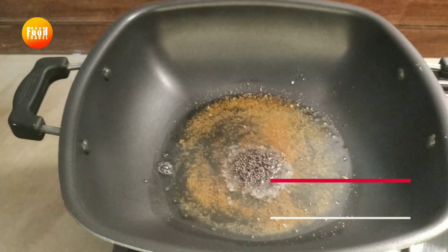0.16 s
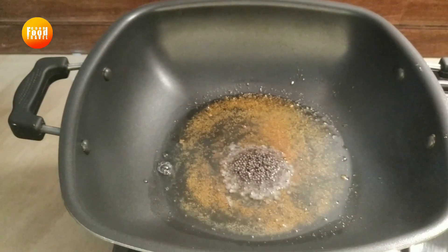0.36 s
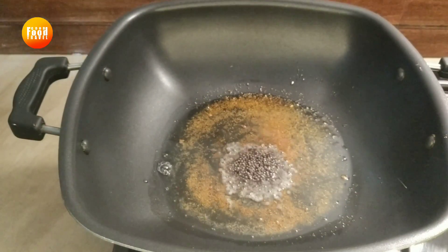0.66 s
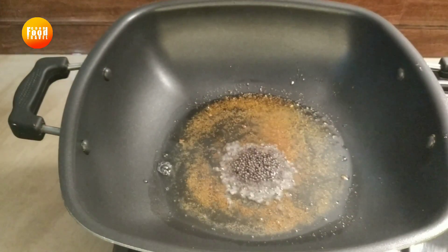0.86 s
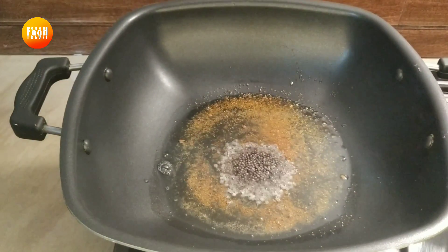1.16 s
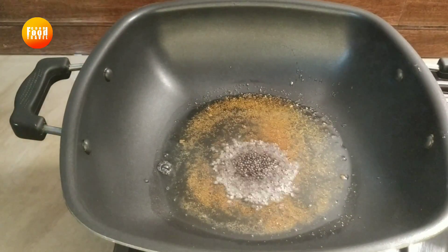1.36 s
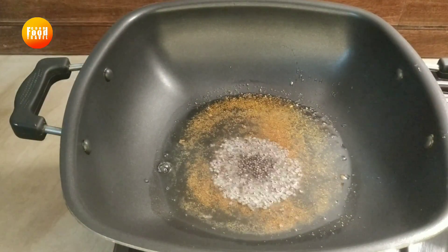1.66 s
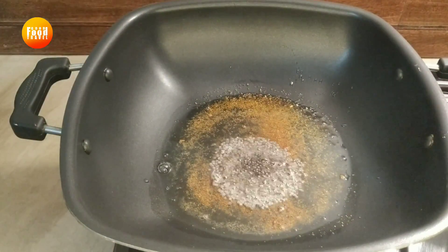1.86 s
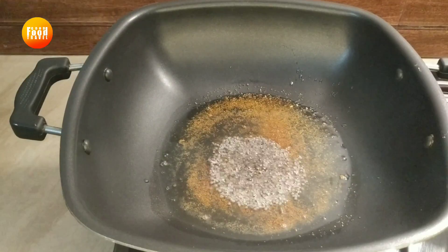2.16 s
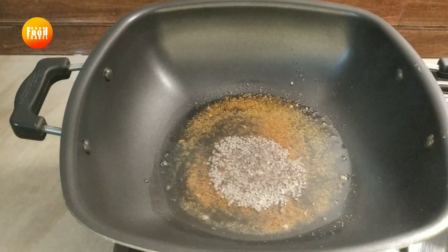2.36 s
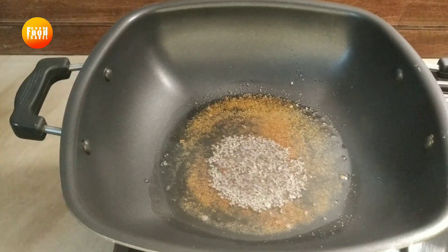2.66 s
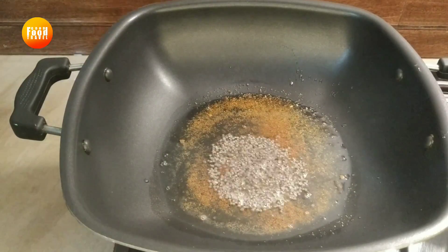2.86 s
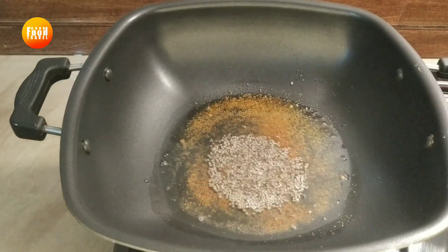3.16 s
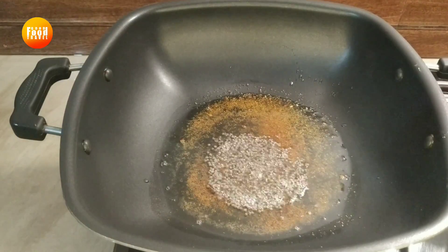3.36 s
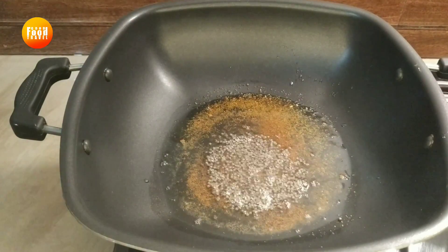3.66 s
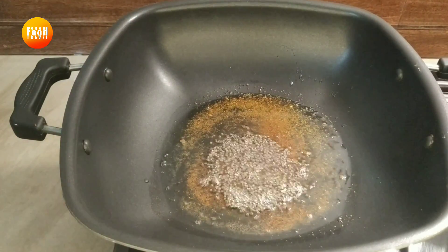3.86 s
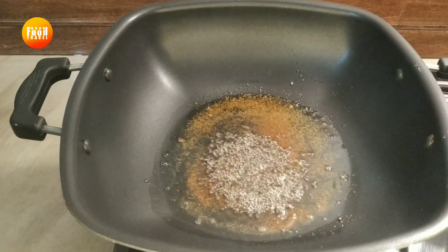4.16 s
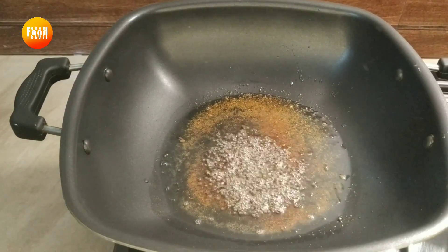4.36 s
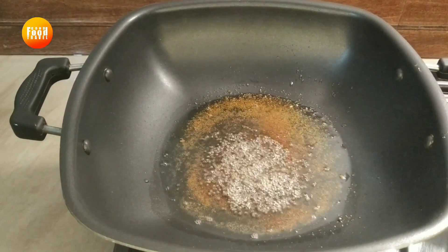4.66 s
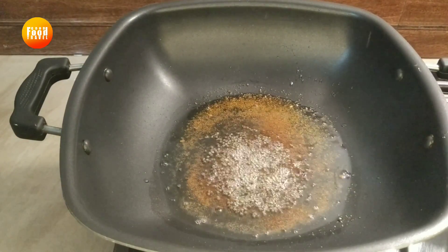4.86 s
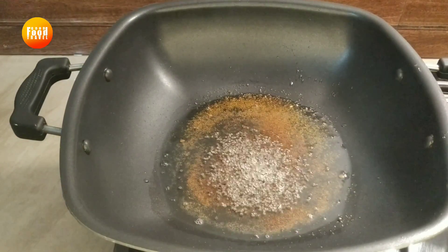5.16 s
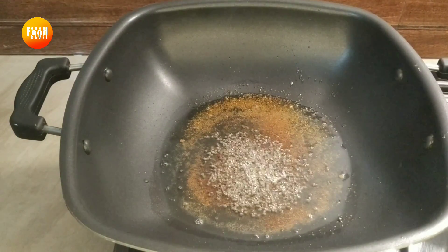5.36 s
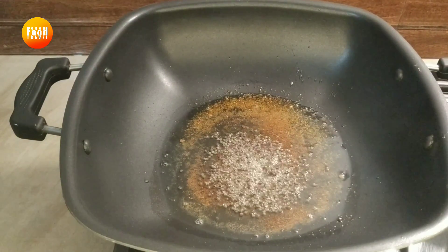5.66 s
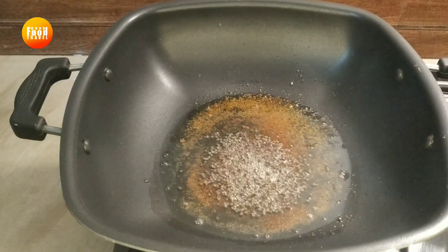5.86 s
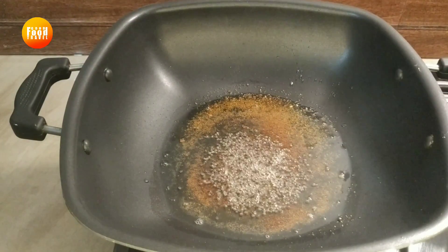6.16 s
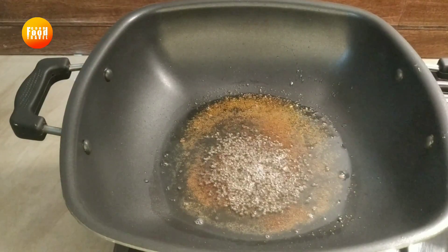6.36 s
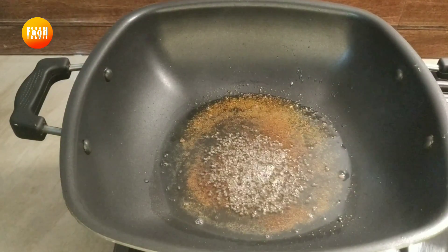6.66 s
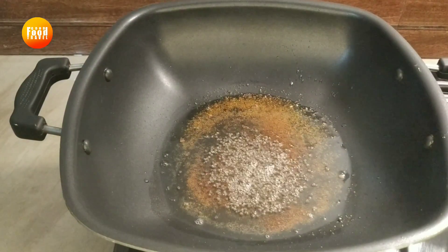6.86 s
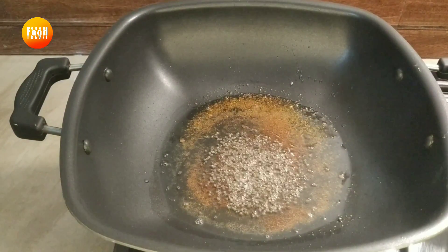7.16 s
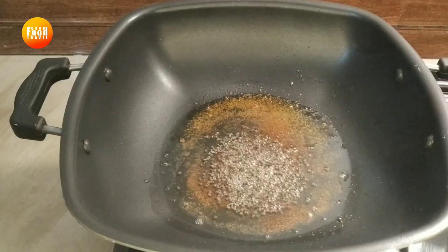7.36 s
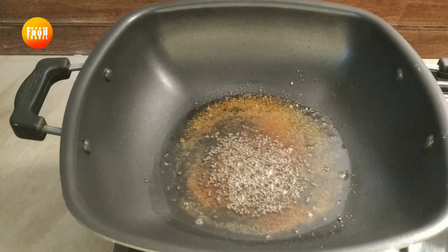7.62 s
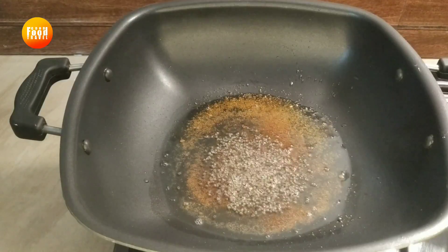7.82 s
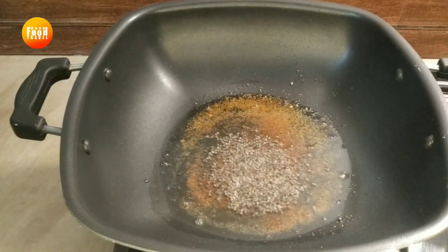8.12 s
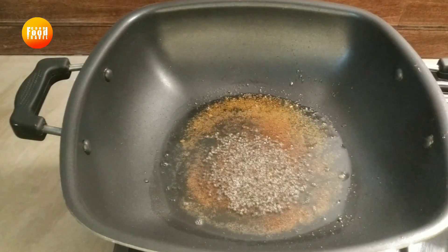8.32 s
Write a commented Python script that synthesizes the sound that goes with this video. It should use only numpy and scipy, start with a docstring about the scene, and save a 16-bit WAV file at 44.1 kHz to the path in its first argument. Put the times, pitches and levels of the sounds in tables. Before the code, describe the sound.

Continuous irregular popping of mustard seeds frying, from tiny ticks to hard cracks, each a few milliseconds long with a brief metallic ring. Some loud cracks carry a low thud. A sudden dry click and drop in echo occur near 1.55 seconds, after which the popping carries on densely. Quiet sizzle, room air and low hum lie underneath. Close, narrow-sounding microphone in a reflective kitchen, with harsh clipped peaks.

```python
"""Mustard seeds burst in hot oil in a deep metal pan, close under a small microphone in a hard-walled kitchen.
Each burst is a few milliseconds of noise: a bright snap and a lower ring, coloured by the bowl, then by the room.
Faint crackle, oil hiss, hum, air noise and clinks lie underneath, with low thuds and a few dry clicks.
The loudest cracks overload the recorder. All layer levels below are those before the recorder."""
import sys
import numpy as np
from scipy import signal
from scipy.fft import rfft, irfft, next_fast_len
from scipy.io import wavfile
from scipy.ndimage import uniform_filter1d

SR = 44100
rng = np.random.default_rng(int(sys.argv[2]) if len(sys.argv) > 2 else 0)


def store_wav(level_fs):
    """Save 16-bit WAV to argv[1]."""
    pcm = np.round(np.clip(np.atleast_2d(level_fs), -1, 1) * 32767)
    wavfile.write(sys.argv[1], SR, pcm.T.astype(np.int16))


N = 374409  # length of the scene in samples

LEAD = 48  # samples: the filtered slices of the bowl begin softly, so bursts start this much early


def undb(db):
    """Turn decibels into a plain factor for the size of the sound wave."""
    return 10 ** (np.asarray(db) / 20)


def level(x, db):
    """Scale a sound so that its average (RMS) level is db."""
    return x * undb(db) / np.sqrt(np.mean(x ** 2))


def shape(x, gain):
    """Filter x by a gain given as a function of Hz, without shifting it in time."""
    size = next_fast_len(len(x) + 4096)
    hz = np.maximum(np.arange(size // 2 + 1) * SR / size, 1)
    return irfft(rfft(x, size) * gain(hz), size)[:len(x)]


def causal(gain):
    """Response to one hit with this gain, silent before the hit (folded cepstrum), peak 1."""
    size = 4096
    hz = np.maximum(np.arange(size // 2 + 1) * SR / size, 1)
    cepstrum = irfft(np.log(gain(hz) + 1e-6), size)
    # folding the second half onto the first moves all the sound after the hit
    cepstrum[1:size // 2] *= 2
    cepstrum[size // 2 + 1:] = 0
    response = irfft(np.exp(rfft(cepstrum)), size)[:size // 4]
    return response / np.abs(response).max()


def curve_db(table, hz):
    """Read a (pitch, level) table at any pitch, with straight lines on a logarithmic pitch scale."""
    table_hz, db = np.transpose(table)
    return np.interp(np.log(hz), np.log(table_hz), db)


def fade(t, t60):
    """Natural fade that falls by 60 dB in t60 seconds."""
    return np.exp(-np.log(1000) * t / t60)


def add(out, s, piece):
    """Mix a piece into out from s seconds on, cutting what runs past the end."""
    i = int(s * SR)
    out[i:i + len(piece)] += piece[:max(len(out) - i, 0)]


def kitchen():
    """Steady air noise and narrow wavering hum, both sinking a little, and the even hiss of the oil."""
    # colour of the air noise: (pitch [Hz], relative level [dB])
    air_colour = [(15, -29.5), (28, 1.5), (40, -2.5), (60, -3), (139, -12.5), (295, -9.5), (394, -15.5),
                  (444, -14), (913, -21.5), (1500, -26.5), (1950, -60), (3300, -120)]
    # hum bands: (pitch [Hz], width [Hz], average level before the sinking [dB])
    hum_bands = [(48.6, 3.2, -59), (98, 23, -67.5), (160, 14, -73.5)]
    # how air and hum sink: (time [s], level [dB])
    sinking = ((7.4, 0.5), (8.1, -1.5))
    air_db, hiss_db = -60.5, -54  # average levels, the air before the sinking

    background = level(shape(rng.standard_normal(N), lambda hz: undb(curve_db(air_colour, hz))), air_db)
    for centre, width, db in hum_bands:
        band = lambda hz: 1 / (1 + (2 * (hz - centre) / width) ** 2)
        background = background + level(shape(rng.standard_normal(N), band), db)
    times, sink_db = np.transpose(sinking)
    background = background * undb(np.interp(np.arange(N) / SR, times, sink_db))
    hiss = level(shape(rng.standard_normal(N), bowl), hiss_db)
    return background + hiss


def bowl(hz):
    """How strongly bowl and microphone pass each pitch: broad colour with the pan's sharper rings on top."""
    # bowl and microphone together: (pitch [Hz], relative level [dB])
    broad_colour = [(470, -69), (900, -39), (1320, -33.5), (1950, -20), (2500, -17), (3300, -5.5),
                    (3750, -8.5), (4150, -16), (5130, -22.5), (5550, -11.5), (6300, -11.5), (6950, 1),
                    (7600, 2), (7950, -26), (8400, -27.5), (9000, -45.5)]
    # sharper rings of the pan: (pitch [Hz], width [Hz], boost [dB])
    pan_rings = [(2010, 80, 3), (2535, 60, 3), (3250, 130, 2), (3698, 50, 4), (5485, 60, 3), (7186, 100, 2)]
    boost_db = sum(db / (1 + (2 * (hz - f) / width) ** 2) for f, width, db in pan_rings)
    return undb(curve_db(broad_colour, hz) + boost_db)


def bowl_slice(name):
    """The low "ring" or high "snap" slice of the bowl's response, with soft edges in pitch, peak 1."""
    # the two slices overlap a little: the ring ends at 5530 Hz, the snap begins at 4690 Hz
    low, high = {"ring": (0, 5530), "snap": (4690, SR)}[name]
    above = lambda hz, edge: .5 + .5 * np.tanh((hz - edge) / 350)
    delayed = np.append(np.zeros(LEAD), causal(bowl))
    response = shape(delayed, lambda hz: above(hz, low) - above(hz, high))
    return response / np.abs(response).max()


def seed_rings(pitch_hz, size=2048):
    """The lower slice of the bowl, heard through each seed's own resonance; peak 1."""
    sharpness, skirt_db = 4.6, -4.5  # Q of the resonance, and the level of what passes beside it
    hz = np.maximum(np.arange(size // 2 + 1) * SR / size, 1)
    ratio = hz / pitch_hz
    resonance = undb(skirt_db) + 1 / (1 + 1j * sharpness * (ratio - 1 / ratio))
    rings = irfft(rfft(bowl_slice("ring"), size) * resonance, size)[:, :size // 2]
    return rings / np.abs(rings).max(axis=1, keepdims=True)


def cracks(rows, spots=6):
    """Short noise bursts strike the bowl; returns the direct sound and what each spot sends to the room."""
    rise_s = 0.00034  # time constant of the attack
    snap_t60_s = 0.0059
    ring_t60_s = 0.0096  # escaping steam drives the ring a little longer than the snap lasts
    rows = np.array(rows)
    start_s, snap_db, ring_db, pitch_hz, room_db = (rows[:, [k]] for k in range(5))

    t = np.arange(int(0.01 * SR)) / SR
    noise = (1 - np.exp(-t / rise_s)) * rng.standard_normal((len(rows), len(t)))
    rings = seed_rings(pitch_hz)
    snap = bowl_slice("snap")[None, :rings.shape[1]]
    grains, spread = 0, 0
    for db, response, t60 in ((snap_db, snap, snap_t60_s), (ring_db, rings, ring_t60_s)):
        rung = signal.fftconvolve(noise * fade(t, t60), response, axes=1)
        grains = grains + undb(db) * rung / np.abs(rung).max(axis=1, keepdims=True)
        # summed over all directions the burst keeps only its colour
        spread = spread + undb(db + room_db) * response

    direct, sent = np.zeros(N), np.zeros((spots, N))
    for n, s in enumerate(np.maximum(start_s[:, 0] - LEAD / SR, 0)):
        add(direct, s, grains[n])
        add(sent[n % spots], s, spread[n])
    return direct, sent


def crackle_rows():
    """Many small bursts at random moments, each with its own pitch and balance of snap and ring."""
    per_second, low_hz, high_hz = 45, 1970, 5000
    quietest_db, spread_db, loudest_db = -46.5, 5, -28  # before up to 12 dB is taken off snap and ring
    rows = []
    for moment, size, ring_cut, snap_cut, pitch in rng.random((int(per_second * N / SR), 5)):
        # most bursts are quiet and few are loud
        db = min(quietest_db - spread_db * np.log(1 - size), loudest_db)
        pitch_hz = low_hz * (high_hz / low_hz) ** pitch
        rows.append((moment * N / SR, db - 12 * snap_cut, db - 12 * ring_cut, pitch_hz, -9))
    return rows


def echo_scatter(count, size=64):
    """Random gain with a new value about every 1.5 ms, so the echo tail sounds grainy and uneven."""
    scatter_db = 1
    steps = np.repeat(rng.standard_normal(count // size + 1), size)[:count]
    return undb(scatter_db * uniform_filter1d(steps, size // 2))


def room(x):
    """Dense echoes: a quick early cluster, then a tail whose decay depends on pitch."""
    # how long the kitchen rings: (pitch [Hz], time to fall by 60 dB [s])
    decay_times = [(1200, 0.46), (2200, 0.33), (3400, 0.34), (5500, 0.37), (7400, 0.36)]
    room_db, gap_s = 8.5, 0.0023  # level of the echoes; silence before the first one
    early_db, early_t60_s = 0, 0.05  # extra early cluster, relative to the tail
    drop_s, drop_db = 1.556, -17  # echoes of everything before this moment drop at once

    t = np.arange(int(.6 * SR)) / SR
    centres = np.log([f for f, _ in decay_times])
    tail = 0
    for k, (_, t60) in enumerate(decay_times):
        this_band = np.eye(len(decay_times))[k]
        share = lambda hz: np.sqrt(np.interp(np.log(hz), centres, this_band))
        tail = tail + shape(rng.standard_normal(len(t)), share) * fade(t, t60)
    tail = tail * (1 + undb(early_db) * fade(t, early_t60_s)) * (t > gap_s)
    tail = tail * echo_scatter(len(t))
    tail = tail / np.sqrt(np.sum(tail ** 2))

    is_before = np.arange(N) < drop_s * SR
    echo_before = signal.fftconvolve(x * is_before, tail)[:N]
    echo_after = signal.fftconvolve(x * ~is_before, tail)[:N]
    return undb(room_db) * (echo_before * np.where(is_before, 1, undb(drop_db)) + echo_after)


def clinks():
    """Faint clinks and whistles nearby: soft fading tones that waver, each at most 0.2 s long."""
    # (time [s], pitch [Hz], level before the soft start and fade [dB], time to fall by 60 dB [s])
    clink_events = [(0.048, 1424, -44.5, 0.17), (0.087, 1022, -52.5, 0.62), (0.377, 1390, -34, 0.11),
                    (.384, 518, -51, 0.21), (0.774, 1860, -57, .2), (4.33, 2440, -46, 0.11),
                    (4.355, 2360, -50.5, 0.23), (4.36, 1500, -54, 0.082), (6.011, 3410, -28, 0.061),
                    (1.11, 2150, -51.5, 0.66), (5.13, 2570, -47, 0.062)]
    out, t = np.zeros(N), np.arange(int(.2 * SR)) / SR
    for s, hz, db, t60 in clink_events:
        band = lambda f: 1 / (1 + ((f - hz) / 70) ** 2)
        waver = level(shape(rng.standard_normal(len(t)), band), 0.5)
        tone = .5 * np.sin(2 * np.pi * hz * t) + waver
        soft_start = np.minimum(t / 0.015, 1)
        add(out, s, undb(db) * tone * soft_start * fade(t, t60))
    return out


def thuds():
    """Low thuds at the moment of some bursts: short dry pulses without room echo."""
    # (time [s], peak level [dB])
    thud_events = [(.1146, -44), (0.9591, -24.5), (1.229, -29), (1.4092, -18.5), (2.333, -47),
                   (2.3742, -26), (2.786, -34), (3.446, -35), (4.663, -38), (5.362, -33), (6.2681, -32),
                   (7.089, -36), (7.414, -32), (7.548, -32.5), (8.267, -38.5)]
    low_hz, high_hz = 124, 1350
    pulse = causal(lambda hz: 1 / (1 + (low_hz / hz) ** 2) / (1 + (hz / high_hz) ** 4))
    out = np.zeros(N)
    for s, db in thud_events:
        add(out, s, undb(db) * pulse)
    return out


def clicks():
    """Dry clicks just before the echoes drop: single jolts spread over a wide band, with no room echo."""
    # (time [s], peak level [dB])
    click_events = [(1.5443, -14.5), (1.5503, -12), (1.5527, -19), (1.553, -2.5), (1.5536, -48),
                    (1.5545, -18)]
    low_hz, high_hz = 305, 4080
    jolt = causal(lambda hz: 1 / (1 + (low_hz / hz) ** 2) / (1 + (hz / high_hz) ** 2))
    out = np.zeros(N)
    for k, (s, db) in enumerate(click_events):
        direction = (-1) ** k  # every other click pushes the opposite way
        add(out, s, direction * undb(db) * jolt)
    return out


def scene():
    """All bursts with their echoes, plus the quieter layers, as one channel."""
    # bursting seeds: (time [s], peak level of the bright snap [dB], peak level of the ring [dB],
    # pitch of the ring [Hz], share sent to the room [dB])
    seed_bursts = [(0.0144, -28.5, -21, 2830, -1), (0.066, -31.5, -42, 5100, 1),
                   (0.1081, -22, -57, 1900, -24), (0.1147, -3.5, -10, 1950, -13),
                   (0.2016, -15.5, -23, 1900, -3.5), (0.2159, -18, -38, 1900, -17),
                   (0.3152, -17.5, -12, 2400, -6.5), (0.4109, -5.5, -6, 2620, -10.5),
                   (0.5047, -20, -7.5, 2400, -5), (0.5385, -44, -13, 3090, -31),
                   (0.556, -15.5, -14, 5600, -1.5), (0.6183, -21.5, -53, 1970, -1.5),
                   (0.6599, -28, -20, 3550, -8.5), (0.8745, -24, -50, 1970, -16),
                   (0.883, -14, -23, 1900, -5.5), (0.8994, -13, -9.5, 2510, -7),
                   (0.9151, -16, -15.5, 5200, -12), (0.9599, -1, -11, 5000, -6.5),
                   (0.9742, -18, -24, 5170, -1), (0.9892, -11.5, -21, 4230, -1.5),
                   (1.0171, -18, -35.5, 2110, 0.5), (1.0456, -20.5, -29.5, 4690, 3),
                   (1.1896, -17.5, -23, 1880, -6), (1.2155, -24, -40, 1900, -3), (1.2288, -1, -8, 4800, -8),
                   (1.2551, -5, -18, 1760, 0.5), (1.3224, -38, -27.5, 4220, -1),
                   (1.3746, -42, -18.5, 2240, -7), (1.3928, -31, -16, 3630, 0),
                   (1.4085, -2.5, -6.5, 1940, -11), (1.4249, -45, -7, 3150, -7.5),
                   (1.4379, -15, -18, 3300, -18), (1.4979, -8.5, -17, 4370, -10),
                   (1.5769, -33, -26.5, 4850, -9), (1.6191, -22.5, -16.5, 3300, -7.5),
                   (1.6645, -37, -36, 3800, 13.5), (1.6765, -12.5, -18.5, 1870, -5.5),
                   (1.8234, -24.5, -36, 2690, 0), (1.8356, -27, -26, 3580, -5.5),
                   (1.9737, -19.5, -20, 2260, 0), (2.0785, -5, -8.5, 3780, -8.5),
                   (2.0938, -12.5, -15.5, 4900, -3), (2.1795, -18.5, -31.5, 1900, -11),
                   (2.312, -23.5, -32, 2060, 0.5), (2.3329, -0.5, -8.5, 1920, -9),
                   (2.3733, -2, -8.5, 4850, -12), (2.5384, -18.5, -16.5, 2530, -2),
                   (2.5564, -11.5, -40, 1900, -23), (2.606, -10.5, -19, 1930, -2.5),
                   (2.6332, -1.5, -26, 2200, -18), (2.6535, -46, -14.5, 2400, -6),
                   (2.6887, -35, -14, 2750, -6), (2.7428, -10, -6.5, 2510, -7.5),
                   (2.7867, 0.5, -13.5, 4400, -8.5), (2.9108, -13.5, -25, 1970, -11),
                   (2.9463, -13.5, -7.5, 3720, -8), (3.0398, -23, -41, 1900, 0),
                   (3.0448, -18.5, -15, 2010, -8), (3.0814, -25, -22, 2880, -5.5),
                   (3.125, -12.5, -13, 5300, -6.5), (3.1619, -20, -15, 2400, -5.5),
                   (3.184, -4.5, -31, 2110, -13.5), (3.2137, -20, -18.5, 3220, -3),
                   (3.3129, -29.5, -20, 4100, 0), (3.4059, -10.5, -20.5, 1900, -12),
                   (3.4191, -21.5, -26.5, 3670, 3), (3.4276, -25.5, -13.5, 2800, -6),
                   (3.4455, -1, -18, 1970, -13.5), (3.5088, -41, -16, 2880, 0.5),
                   (3.5251, -16.5, -12.5, 5200, -7.5), (3.5653, -11, -22, 1920, -10),
                   (3.6079, -31, -23.5, 1950, 2), (3.6553, -23, -15, 4800, -3.5),
                   (3.7044, -13, -11, 2330, -4.5), (3.802, -5.5, -7.5, 5300, -10.5),
                   (3.9675, -28, -13, 2800, -1), (4.0005, -14.5, -8, 3350, -6),
                   (4.054, -42, -24, 5200, -29), (4.1128, -31.5, -8.5, 2950, -11),
                   (4.1261, -26.5, -24.5, 2980, 0), (4.1525, -19, -10, 2420, -6),
                   (4.1789, -12.5, -10.5, 4970, -8), (4.3896, -29.5, -43, 4370, 1),
                   (4.41, -6.5, -17.5, 1870, -7.5), (4.4294, -3.5, -10.5, 1900, -12.5),
                   (4.4812, -38, -16.5, 3310, -4.5), (4.5089, -15, -11, 4260, -3),
                   (4.5669, -22.5, -24.5, 1900, -14.5), (4.5856, -13.5, -8, 5200, -4.5),
                   (4.5992, -31, -24, 2340, -25), (4.6272, -11, -22.5, 1900, -6.5),
                   (4.6622, -6.5, -15, 1850, -6.5), (4.698, -17, -8.5, 3430, -9),
                   (4.7951, -28, -24.5, 2980, -2), (4.8099, -20.5, -42, 3670, 1),
                   (4.8262, -11, -4, 2020, -11), (4.8588, -10.5, -12, 4690, -3.5),
                   (4.9774, -19.5, -23.5, 3970, -0.5), (4.9933, -19, -25, 1900, -5),
                   (5.0613, -31, -30.5, 1880, -9), (5.0912, -17, -17, 4600, -4.5),
                   (5.115, -26, -15.5, 2450, -6), (5.1737, -20, -16.5, 3800, -4),
                   (5.216, -25, -28.5, 1900, -25), (5.2756, -18, -25, 5200, -8),
                   (5.2824, -11, -9.5, 2800, -7.5), (5.3409, -44, -23, 2600, -1),
                   (5.3634, -4.5, -6, 5200, -7), (5.4595, -12.5, -3, 3070, -7.5),
                   (5.6549, -13.5, -17, 1900, 0.5), (5.7049, -44, -19.5, 2600, -7.5),
                   (5.7828, -8.5, -17, 1800, -8.5), (5.8963, -8.5, -12.5, 1880, -7.5),
                   (6.0095, -33.5, -31.5, 3400, 3), (6.0689, -16, -19, 2000, -8.5),
                   (6.1092, -38, -22.5, 4370, 4), (6.1383, -2, -21, 1900, -14),
                   (6.1706, -35, -17, 3600, -4), (6.1944, -22, -35, 5200, -25),
                   (6.212, -20.5, -26, 2040, -4), (6.2604, -13.5, -6.5, 3460, -8),
                   (6.2679, 0, -17, 1970, -11.5), (6.2944, -13.5, -8.5, 2130, -10),
                   (6.3278, -13, -10, 3000, -7), (6.3943, -19, -13, 2080, -8.5),
                   (6.4113, -26, -16, 2420, -5.5), (6.4473, -12, -3.5, 2230, -3),
                   (6.4847, -13.5, -17.5, 2040, -5.5), (6.5735, -29.5, -20, 3310, -3.5),
                   (6.6168, -23, -11, 3250, -6), (6.6699, -8, -23, 1900, -10), (6.6849, -19, -23, 3090, -5),
                   (6.7128, -17.5, -16, 2000, -8), (6.7483, -18, -10.5, 5360, -6.5),
                   (6.7703, -13.5, -7.5, 5140, -7), (6.8811, -33, -25.5, 2340, -0.5),
                   (6.9033, -22, -17.5, 2980, -6.5), (6.9254, -19, -16, 3090, -6),
                   (6.9927, -14.5, -23, 1900, -7.5), (7.0342, -11, -9.5, 3620, -6.5),
                   (7.0885, -6, -5.5, 2040, -8.5), (7.1641, -19, -37, 4690, -13),
                   (7.1984, -10.5, -9.5, 5040, -3.5), (7.2511, -5.5, -25.5, 1900, -15),
                   (7.3299, -18, -26.5, 1900, -9.5), (7.3599, -3.5, -10, 1900, -8.5),
                   (7.3773, -21, -14, 1870, -2), (7.3925, -15, -18.5, 2690, -14),
                   (7.4134, -1.5, -11, 1900, -13.5), (7.5317, -33, -24, 2730, 7),
                   (7.5471, -7, -11.5, 4730, -9), (7.5809, -27, -17, 2950, -3),
                   (7.6778, -16, -10.5, 2770, -5), (7.6847, -32, -8.5, 2160, -9.5),
                   (7.7067, -21, -29, 2040, -23), (7.7625, -33, -21, 5170, -13),
                   (7.8006, -25.5, -16, 3620, -8.5), (7.847, -18.5, -10, 2600, -10),
                   (7.8602, -12.5, -13.5, 2120, -5), (7.8701, -34, -10, 2170, -0.5),
                   (7.9015, -20, -17, 3800, -7), (7.9213, -9, -10.5, 3310, -11),
                   (7.9965, -13.5, -16, 5050, -3.5), (8.0139, -44, -15, 3870, -6.5),
                   (8.1011, -10, -13, 3820, -6.5), (8.1259, -15, -18, 1900, -8.5),
                   (8.1489, -31, -19.5, 2960, -8.5), (8.231, -22, -23.5, 1900, 4),
                   (8.2661, -9.5, -9.5, 4250, -11), (8.2827, -19, -16.5, 2260, -10.5),
                   (8.2918, -36, -11.5, 3660, -7.5), (8.3422, -26, -24.5, 4850, 2.5),
                   (8.3652, -28, -38, 1900, -12), (8.4075, -10, -22.5, 1860, -3),
                   (8.4204, -22, -35, 2690, -5), (8.4594, -15, -25.5, 1906, -15)]
    direct, sent = cracks([*seed_bursts, *crackle_rows()])
    # seeds burst at different spots of the pan, and each spot hears its own echoes
    echoes = sum(room(spot) for spot in sent)
    mix = direct + echoes + thuds() + clicks() + clinks() + kitchen()
    return mix[None]


def record(dry):
    """Narrow-band capture, then a hard overload that sprays above the band, then the final treble cut."""
    drive_db, clip_db = 1.5, 0
    band_top_hz, final_top_hz = 8480, 15600
    band_filter = signal.ellip(10, .2, 80, band_top_hz, fs=SR, output="sos")
    final_filter = signal.ellip(8, .2, 60, final_top_hz, fs=SR, output="sos")
    narrow = signal.sosfilt(band_filter, undb(drive_db) * dry)
    clipped = np.clip(narrow, -undb(clip_db), undb(clip_db))
    return signal.sosfilt(final_filter, clipped)


dry = scene()
out = record(dry)
store_wav(out)
```